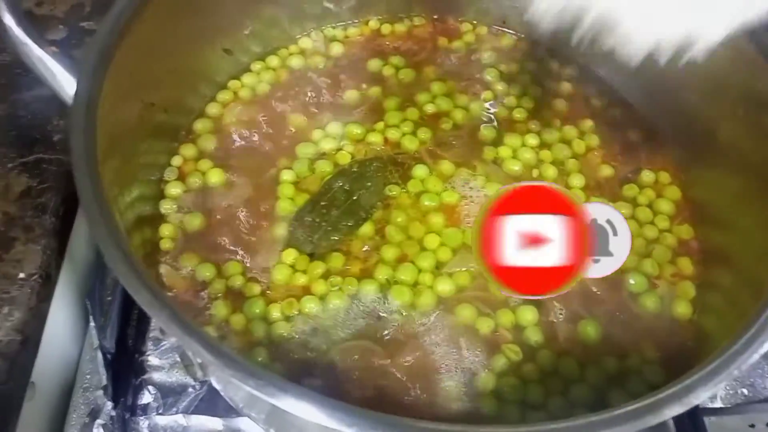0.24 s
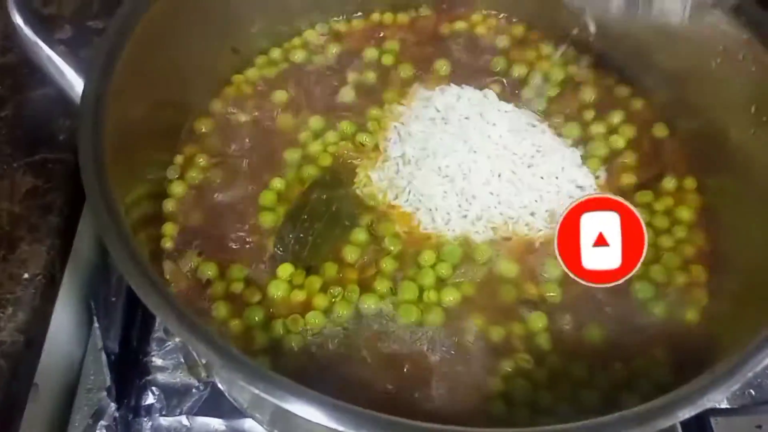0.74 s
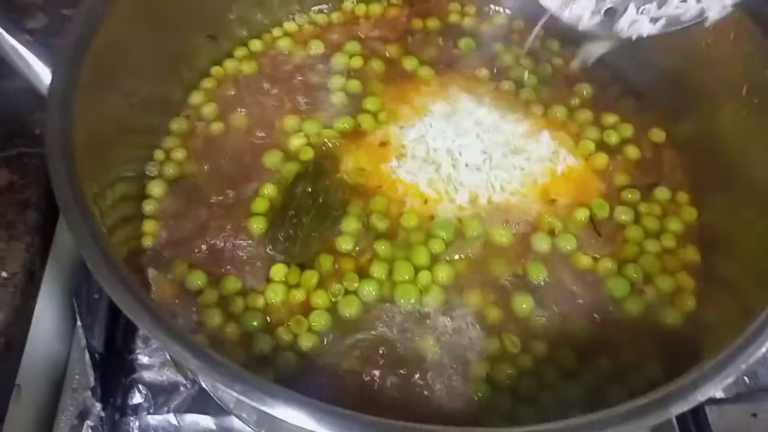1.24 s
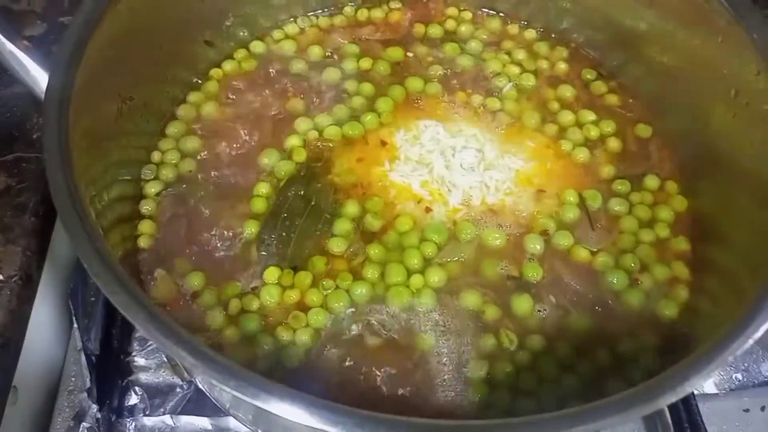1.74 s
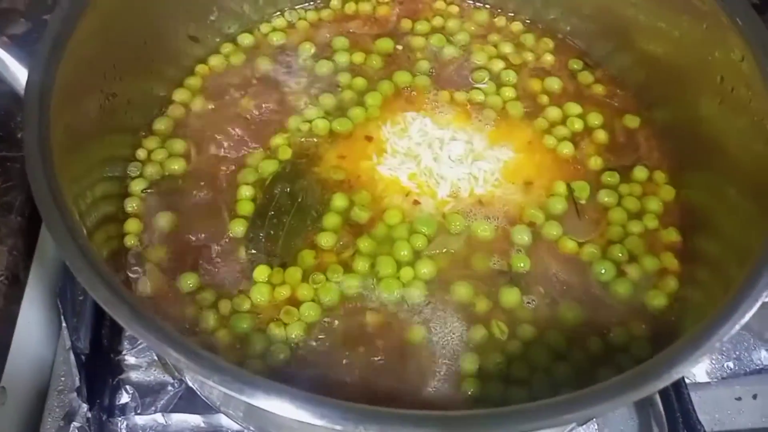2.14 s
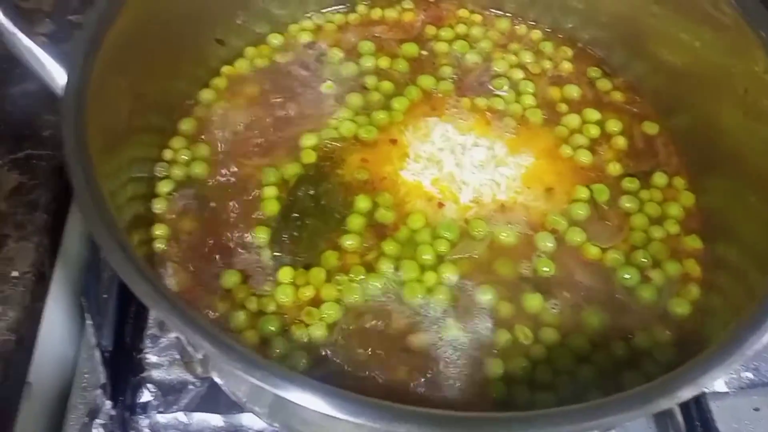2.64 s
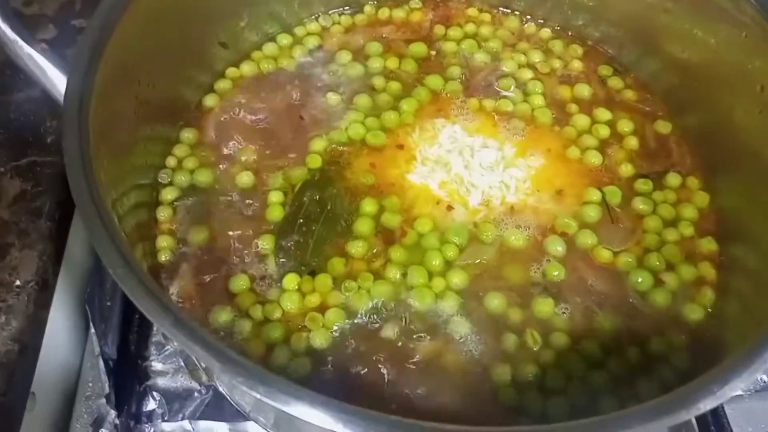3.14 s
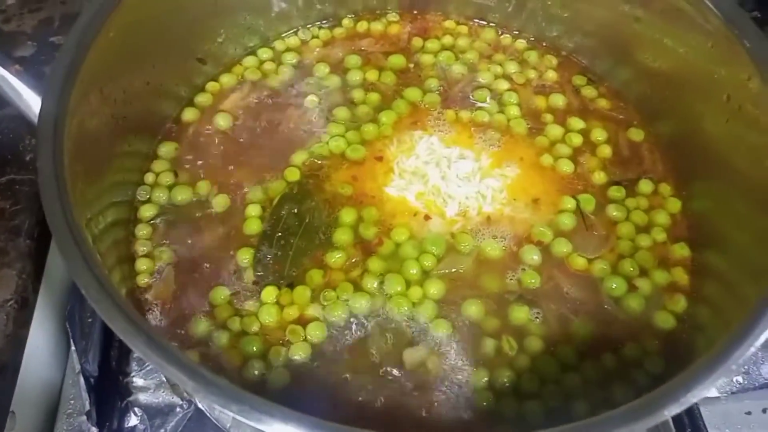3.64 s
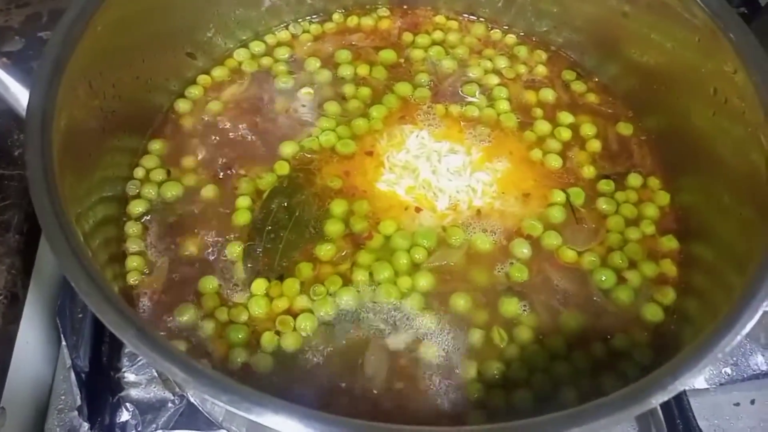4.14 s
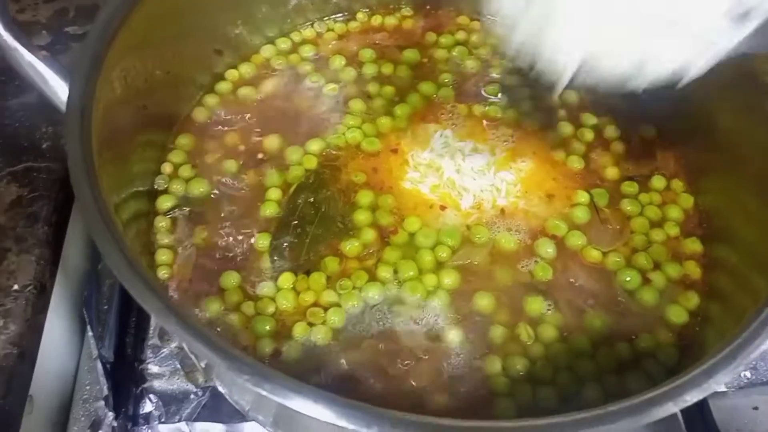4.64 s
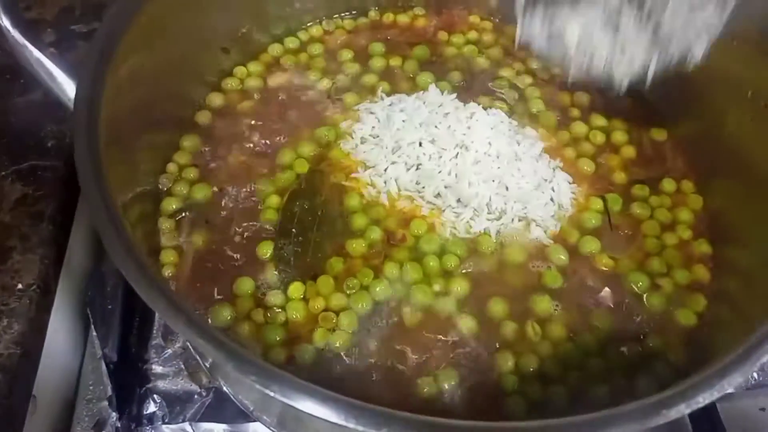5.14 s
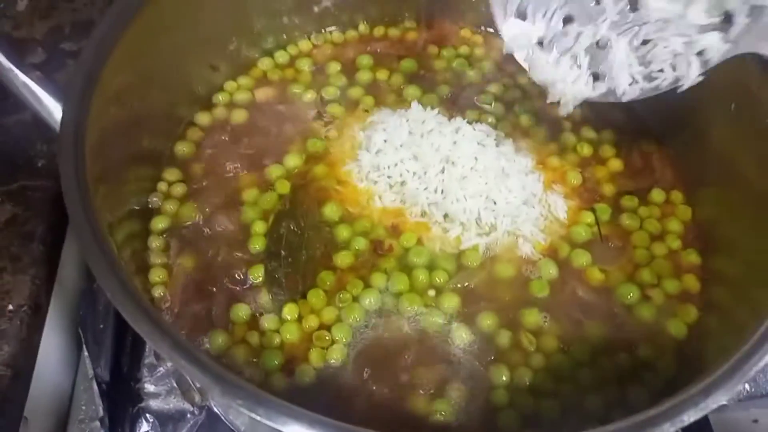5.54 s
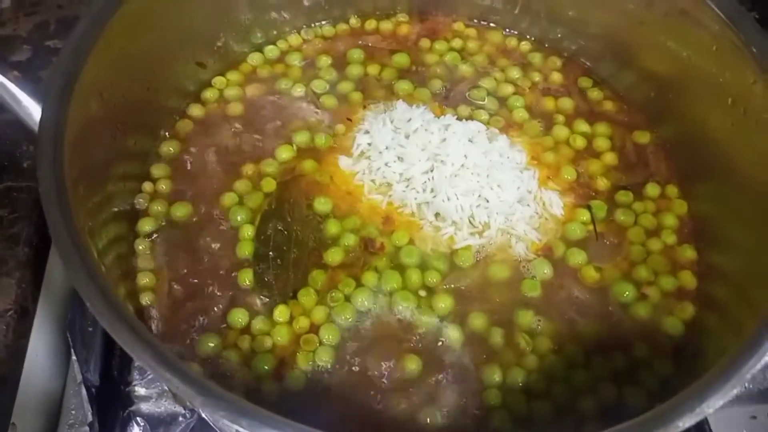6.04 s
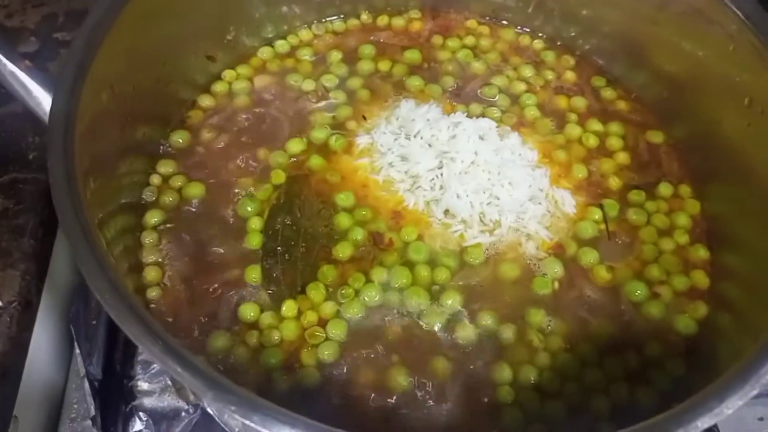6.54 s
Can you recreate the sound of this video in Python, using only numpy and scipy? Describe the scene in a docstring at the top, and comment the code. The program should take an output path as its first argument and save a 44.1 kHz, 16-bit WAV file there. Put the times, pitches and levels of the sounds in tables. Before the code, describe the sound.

A small home kitchen, heard close above a steel pot. A very quiet bed runs throughout: low burner rumble, fine bubbling fizz, and a faint wavering hollow tone from the pot. At about 0.2 s a ladleful of dry rice skids off steel in a dense, bright rush, with a soft trickle near 0.45 s, then stray ticks over the simmer. Around 2.15 s there are light metal touches; at 2.4 s the ladle knocks and digs into a bowl of rice, crunching, scraping and squeaking briefly until a crisp clink at 2.9 s. Simmer and tiny ticks return until 4.8 s, when two quick steel taps ring and grains patter faintly. At 5.23 s comes the loudest sound, a hard, sharp clank with a short ringing tail. After another lull, bright clinks sound at 6.4 s and 6.65 s, quickly dying away.

```python
"""Rice into simmering peas

Small kitchen, microphone just above a steel pot of peas on a burner; a ladle brings rice from a bowl.
Grains rush off the ladle, shift, trickle and land: dense random clicks, coloured, with short echoes.
The ladle digs into the bowl, knocks on the rim and clinks down: noise bursts with ringing metal modes.
Underneath, the burner rumbles and the pot sings faintly (filtered noise), and tiny bubbles burst."""
import sys
import numpy as np
from scipy import signal
from scipy.fft import rfft, irfft, next_fast_len
from scipy.io import wavfile
from scipy.ndimage import uniform_filter1d

SR = 44100
rng = np.random.default_rng(int(sys.argv[2]) if len(sys.argv) > 2 else 0)


def dump(signal):
    """Clip the signal to [-1, 1] and save it as 16-bit WAV at the path in sys.argv[1]."""
    limited = np.clip(np.atleast_2d(signal).T, -1, 1)
    pcm = np.round(limited * 32767).astype(np.int16)
    wavfile.write(sys.argv[1], SR, pcm)


N = 298772
TIME = np.arange(N) / SR

# flame and simmer spectrum: pitch_hz [Hz], level_db [dB per Hz, relative]
BURNER_COLOUR = [(18, -64), (30, -51), (87, -5.5), (132, -4.5), (231, -19), (275, 4.5), (340, -10.5),
                 (908, -8), (1060, -2.5), (1290, -16), (1680, -23.5), (1850, -24.5), (3000, -30),
                 (3900, -65), (6600, -120)]
# hollow tones of the heated pot: pitch_hz [Hz], width_hz [Hz], level_db [dB]
HOLLOW_TONES = [(87.5, 22, -92.5), (263.6, 47, -82.5), (993, 17, -95.5), (1856, 100, -81.5),
                (2706, 73, -87), (9070, 68, -97)]
# the singing tone's level wanders at random: time_s [s], level_db [dB, before SING_GAIN_DB]
SING_LEVEL_CURVE = [(0, -66.5), (0.25, -70), (0.48, -60.5), (0.65, -68.5), (1.3, -66.5), (1.9, -64),
                    (2.15, -67), (2.9, -65.5), (3.05, -75), (3.25, -63.5), (3.7, -68.0), (4.3, -62.5),
                    (4.55, -66.5), (4.85, -65), (5.1, -72), (5.75, -69.5), (6.0, -64), (6.3, -73)]
# fine bubble fizz spectrum: pitch_hz [Hz], level_db [dB per Hz, relative]
FIZZ_COLOUR = [(1500, 10.5), (2600, 4.5), (3100, 4), (4500, 4), (6500, 1), (8000, -4.5), (9600, -1),
               (11500, -7), (13500, -8), (15200, 2)]
# sparse bubble prickle spectrum: pitch_hz [Hz], level_db [dB per Hz, relative]
PRICKLE_COLOUR = [(3000, -13.5), (6000, 6), (8000, -11.5), (10000, 6.5), (13000, -13.5), (15500, 0.5)]
# grains skidding off the steel, spectrum: pitch_hz [Hz], level_db [dB per Hz, relative]
RUSH_SPECTRUM = [(710, -60), (1200, -76), (1520, -19.5), (1770, -25), (1950, -12.5), (2270, -8.5),
                 (2450, -12.5), (2650, -6), (6300, 1), (7820, -4.5), (10100, 1.5), (12300, -11),
                 (16000, -5.5)]
# rice shifting, trickling and landing: start_s [s], level_db [dB], swell_s [s], fade_db_per_s [dB per s]
RICE_POURS = [(.44, -57, 0.11, 100), (2.34, -66, 0.074, 400), (2.97, -70, .04, 73),
              (4.9, -65.5, 0.024, 120), (5.065, -75.5, 0.008, 151.5)]
# rice shifting, trickling and landing, spectrum: pitch_hz [Hz], level_db [dB per Hz, relative]
PATTER_SPECTRUM = [(880, -56), (1500, -13), (1870, -14), (2390, -24), (2640, -7), (3030, -12), (5770, -1),
                   (8000, -11), (9010, -6), (12500, -20), (16000, -8.5)]
# stray grains and single bubbles: start_s [s], pitch_hz [Hz], level_db [dB, relative], t60_s [s]
STRAY_BLIPS = [(1.02, 443, -60, 0.11), (1.11, 1840, -69.5, 0.26), (1.188, 1830, -71.5, 0.37),
               (1.23, 9980, -68, 0.065), (1.74, 1850, -73, 0.078), (3.281, 545, -63, 0.12),
               (3.298, 9300, -69, 0.055), (3.394, 1845, -68, 0.11), (3.552, 4970, -71.5, 0.043),
               (3.69, 1830, -76, 0.31), (4.308, 4330, -69.5, 0.052), (5.073, 10150, -61, 0.066),
               (5.074, 6270, -70, 0.14)]
# ladle contacts: start_s [s], level_db [dB], rise_s [s], t60_s [s], tail_db, thud_db, body_db, top_db
# [dB, relative to the contact], ladle_ring_db, bowl_ring_db, pot_ring_db [dB, relative],
# hollow_focus_hz [Hz], hollow_db [dB, relative]
LADLE_CONTACTS = [ (2.147, -49, 0.00058, 0.051, -28, 5, -3, -17, -82, -82, -78, 1290, -64),
                  (2.16, -64, .003, 0.055, -14, 4, 10, -9, -75, -62.5, -93, 417, -41.5),
                  (2.332, -51.5, 0.00043, 0.015, -12, 18, -41, -7, -76, -68, -96, 154, -53),
                  (2.423, -35, 0.0011, 0.071, -37, 2, 16, -6, -72, -39.5, -92, 660, -34),
                  (2.927, -32.5, 0.00047, 0.061, -24, -4.5, -5.5, -4.5, -59, -88, -65, 1620, -54.5),
                  (4.817, -41.5, 0.00067, 0.029, -1, -7, -1.5, -3, -58, -70, -47, 382, -49),
                  (4.879, -44, 0.00057, 0.048, -34, 14.5, 4.5, -15, -66, -74, -69, 2130, -51.5),
                  (5.229, -19.5, 0.0024, 0.12, -23, -4.5, -21, -15.5, -70.5, -58, -24, 399, -30.5),
                  (6.378, -31.5, 0.00097, 0.03, -6.5, -8.5, -19, 0.5, -43, -69, -59, 1080, -39),
                  (6.423, -38, 0.002, 0.11, -24.5, 6, 12, -8, -54, -55, -54, 160, -58),
                  (6.647, -25, 0.0064, 0.12, -16, -30, -3.5, -2, -35, -68, -61, 1260, -41)]
# crowd of close steel modes that every contact stirs: pitch_hz [Hz], level_db [dB per Hz, relative]
STEEL_COLOUR = [(65, -22.5), (150, 6), (230, -5.5), (430, -1), (780, -18.5), (1400, -5.5), (1700, -18),
                (2600, 0.5), (3300, -7), (4300, -1), (6300, 4.5), (8000, -2), (10000, 3.5), (13000, -6.5),
                (15500, -2)]
# air inside the vessels: pitch_hz [Hz], level_db [dB, relative], t60_s [s]
AIR_MODES = [(155.7, -1, 0.47), (401, -3, 0.12), (535, -11.5, 0.18), (634, -6, 0.096), (965, -2.5, 0.065),
             (1286, -9, 0.14), (1466, 0, 0.12), (2075, -10.5, 0.34)]
# ringing modes of ladle, bowl and pot: pitch_hz [Hz], level_db [dB, relative], t60_s [s]
LADLE_MODES = [(1307, -19, 0.22), (1452, -13, 0.24), (2517, -21, 0.24), (2630, -19, 0.2), (2954, -13, 0.19),
               (3323, -17, 0.24), (3510, -8, 0.17), (3900, -11, 0.15), (4472, -2, 0.11), (4610, -11, 0.17),
               (4885, -1, 0.12), (5056, -16, 0.24), (5217, -7, 0.18), (5337, -12, 0.18), (5691, -7, 0.14),
               (6264, -8, 0.19), (6444, -9, 0.19), (6549, -8, 0.14), (6726, -2, 0.14), (6848, -11, 0.18),
               (6959, 0, 0.1), (7313, -11, 0.17), (9439, -5, 0.11), (10220, 0, 0.1)]
BOWL_MODES = [(520, -3, .15), (655, 3, .16), (980, -10, .12), (1290, -4, .18), (1410, -3, .18),
              (1900, -9, .14), (2030, -3, .15), (2140, -6, .15)]
POT_MODES = [(987, -9, 0.5), (1968, -10, 0.35), (2016, -19, 0.5), (2056, -21, 0.49), (2459, -13, 0.3),
             (2627, -16, 0.38), (2815, -13, 0.3), (2910, -17, 0.3), (3676, -20, 0.5), (4033, -16, 0.3),
             (4082, -9, 0.32), (4125, -21, 0.47), (4216, -2.5, 0.36), (4335, -18, 0.42), (4388, -14, 0.42),
             (4468, -18, 0.49), (4950, -8, 0.33), (5434, -16, 0.32), (5512, -6, 0.35), (5586, -11, 0.35),
             (5716, -17, 0.35), (5808, -18, 0.35), (5927, -9, 0.35), (5993, -11, 0.34), (6149, -9, 0.35),
             (6201, -14, 0.35), (6244, -17, 0.35), (6280, -14, 0.35)]
# the pot wall's crowded weaker modes, heard as a wash: pitch_hz [Hz], level_db [dB per Hz, relative]
POT_WASH_COLOUR = [(900, -11), (1700, -26.5), (2100, 0), (2900, -23.5), (3300, -19), (3700, -9), (4300, 4),
                   (4800, -7), (5700, 3.5), (6350, 8.5), (6900, -39), (8000, -42.5), (9400, -27.5),
                   (12000, -42.5)]
# close modes of pot and ladle that a tap favours, left shimmering:
# start_s [s], pitch_hz [Hz], width_hz [Hz], level_db [dB], t60_s [s]
MODE_SHIMMERS = [(2.149, 1310, 160, -53, 0.13), (2.333, 6700, 300, -52, 0.046),
                 (2.928, 5750, 350, -53.5, 0.42), (2.929, 2440, 600, -50, 0.15),
                 (4.816, 5160, 500, -46, 0.23), (4.818, 2810, 200, -50.5, 0.19),
                 (4.834, 405, 60, -56, 0.22), (5.231, 2094, 130, -36, 0.2),
                 (5.232, 6350, 304.6, -37.5, 0.16), (6.377, 3930, 603, -35.5, 0.17),
                 (6.378, 1017, 90, -39, 0.14), (6.423, 6850, 900, -54, 0.18), (6.65, 5220, 130, -42, 0.22),
                 (6.665, 410, 59, -53.5, 0.18)]
# slips of the ladle along the bowl: start_s [s], level_db [dB, relative], squeak_hz [Hz]
LADLE_SLIPS = [(2.4886, -41, 6500), (2.5384, -68, 6500), (2.5606, -63, 6500), (2.579, -34.5, 10600),
               (2.604, -35.5, 10520), (2.617, -32.5, 6400), (2.6314, -37, 6300), (2.6883, -43.5, 4440),
               (2.7446, -48.5, 4500), (2.8606, -54.5, 5730)]
# resonances of bowl and ladle, damped by the rice: pitch_hz [Hz], width_hz [Hz], level_db [dB, relative]
DIG_RESONANCES = [(1285, 12, -5), (1442, 62, -3.5), (2112, 53, -11), (2720, 55, -10.5), (3400, 130, -14),
                  (3830, 82, -12), (4700, 100, -6.5), (5200, 93, -3), (5900, 40, -3), (6300, 107, 1.5),
                  (8030, 640, -12.5), (10050, 95, -0.5), (10800, 36, -6), (12500, 620, -20),
                  (14500, 430, -14)]

SING_HZ, SING_WIDTH_HZ, SING_GAIN_DB = 1093, 16, -3.35
SING_STEADINESS = 0.15   # 0 wavers freely, 1 has an even level
PLOPS_PER_S, PLOP_DB, PLOP_CYCLES = 16, -79.5, 11.5   # big slow bubbles in the broth
POPS_PER_S, POP_DB, POP_CYCLES = 30, -84.5, 70   # small ones at the surface
RUSH_S, RUSH_DB, RUSH_ATTACK_S, RUSH_FADE_DB_PER_S = 0.1853, -28.5, 0.013, 435
CLUMPS_PER_S, CLUMP_DB = 90, 3   # rice moves in clumps
STRUCK_SING_DB, STRUCK_SING_T60_S = -34.5, 0.56   # a knock rings the singing tone; relative to the knock
STILL_AFTER_S, STILL_DB_PER_S = 0.25, 170   # the ladle settles on the metal and stills it
POT_RING_DB, RING_WET_DB, STRIKE_SPREAD_DB = -8.5, -15, 1
# one scoop: the ladle bites, the rice gives way, the ladle lifts out
DIG_S, DIG_DB, DIG_ATTACK_S, DIG_SAG_DB_PER_S = 2.425, -45, 0.0079, 43.5
DIG_HOLD_S, DIG_LIFT_DB_PER_S = 0.29, 175
# first touch of the hardest knock
CRACK_S, CRACK_DB, CRACK_LEFT_DB, CRACK_RIGHT_DB = 5.2311, 3, 4, 0.5
CRACK_ABOVE_HZ, CRACK_DULL_HZ = 6500, 7000
SIDE_DB, SIDE_ABOVE_HZ = -26.5, 7060   # faint treble copy, opposite in sign left and right
CUTOFF_HZ = 15900


def from_db(db):
    """Decibels to gain."""
    return 10 ** (np.asarray(db) / 20)


def rms_one(x):
    """Scale to unit power."""
    return x / np.sqrt(np.mean(x ** 2) + 1e-20)


def at_hz(points, hz):
    """Read a spectrum on a log-frequency axis."""
    point_hz, db = np.transpose(points)
    return np.interp(np.log(hz + 1), np.log(point_hz), db)


def coloured(x, spectrum):
    """Give a signal a spectrum that falls away below its lowest point; rms 1."""
    size = next_fast_len(len(x))
    hz = np.arange(size // 2 + 1) * SR / size
    skirt = np.minimum(hz / spectrum[0][0], 1) ** 2
    gain = from_db(at_hz(spectrum, hz)) * skirt
    return rms_one(irfft(rfft(x, size) * gain, size)[:len(x)])


def resonate(x, hz, width):
    """Two-pole resonance with gain about 1 on top."""
    r = np.exp(-np.pi * width / SR)
    feed = np.array([1, 0, -1]) * (1 - r * r) / 2
    poles = [1, -2 * r * np.cos(2 * np.pi * hz / SR), r * r]
    return signal.lfilter(feed, poles, x + 1e-18)


def flicker(per_s, size=N):
    """Random wander with a spread of about 1, straight lines between per_s knots a second."""
    knots = rng.standard_normal(700)
    return np.interp(TIME[:size] * per_s, np.arange(len(knots)), knots)


def grains(per_s, spread_db):
    """Random clicks of uneven size and either sign; rms 1."""
    sizes = from_db(spread_db * np.minimum(rng.exponential(1, N), 4)) * rng.choice([-1, 1], N)
    return rms_one(sizes * (rng.random(N) < per_s / SR))


def add(out, s, sound):
    """Mix a sound in at a time."""
    at = int(s * SR)
    out[at:at + len(sound)] += sound[:N - at]


def gesture(s, db, attack, fade_db_per_s):
    """Gain over time: a straight swell to full level, then a steady fade in dB."""
    age = TIME - s
    return np.clip(age / attack, 0, 1) * from_db(db - fade_db_per_s * np.maximum(age - attack, 0))


def steely(x):
    """Thin steel passes some pitches and swallows others, about every 110 Hz; rms 1."""
    size = next_fast_len(len(x))
    hz = np.arange(size // 2 + 1) * SR / size
    ripple_db = 4.5 * np.clip(rng.standard_normal(210), -2, 1.5)
    depth = np.minimum(hz / 3000, 1)   # shallower in the lows
    gain = from_db(np.interp(hz / 110, np.arange(len(ripple_db)), ripple_db) * depth)
    return rms_one(irfft(rfft(x, size) * gain, size)[:len(x)])


def kitchen(x, wet_db, t60):
    """Dense echoes from the pot's wall and the room, duller than the direct sound."""
    t = TIME[:SR // 2]
    tail = rng.standard_normal(len(t)) * from_db(-60 * t / t60) * (t > 0.003)
    tail = signal.sosfilt(signal.butter(2, 7000, fs=SR, output="sos"), tail)
    return x + from_db(wet_db) * signal.fftconvolve(x, tail / np.linalg.norm(tail))[:N]


def burner():
    """Flame rumble as coloured noise, with a rolling low resonance that flickers."""
    flame = from_db(-70) * coloured(rng.standard_normal(N), BURNER_COLOUR)
    low = resonate(resonate(rng.standard_normal(N), 169, 110), 169, 110)
    return flame + from_db(-82.5 + 2.5 * flicker(23)) * rms_one(low)


def pot_hollow():
    """The heated pot's hollow tones: noise through resonances whose levels flicker."""
    out = np.zeros(N)
    for hz, width, db in HOLLOW_TONES:
        tone = rms_one(resonate(rng.standard_normal(N), hz, width))
        out += from_db(db + 2 * flicker(48)) * tone
    return out


def pot_singing():
    """A narrow resonance fed by noise wavers, is partly evened out, and wanders in level."""
    waver = resonate(rng.standard_normal(N), SING_HZ, SING_WIDTH_HZ)
    waver = resonate(waver, SING_HZ, SING_WIDTH_HZ)
    power = uniform_filter1d(waver ** 2, size=SR // 12) + 1e-20
    evened = rms_one(waver / power ** (SING_STEADINESS / 2))
    level_db = np.interp(TIME, *np.transpose(SING_LEVEL_CURVE))
    return from_db(SING_GAIN_DB + level_db) * evened


def bubbles(per_s, low_hz, high_hz, cycles, count):
    """Bubbles burst at random, each ringing for some cycles at one of many pitches; rms 1."""
    out = np.zeros(N)
    for hz in np.geomspace(low_hz, high_hz, count):
        bursts = grains(per_s / count, spread_db=0)
        out += resonate(bursts, hz, 2 * hz / cycles) / np.sqrt(hz)
    return rms_one(out)


def broth():
    """Bubbles from slow plops and surface pops, which ring, to prickle and fine fizz."""
    plops = bubbles(PLOPS_PER_S, low_hz=97.6, high_hz=560, cycles=PLOP_CYCLES, count=12)
    pops = bubbles(POPS_PER_S, low_hz=775, high_hz=2050, cycles=POP_CYCLES, count=16)
    fizz = from_db(-74.5) * coloured(rng.standard_normal(N), FIZZ_COLOUR)
    prickle = from_db(-82.5) * coloured(grains(320, spread_db=2), PRICKLE_COLOUR)
    return from_db(PLOP_DB) * plops + from_db(POP_DB) * pops + fizz + prickle


def rice_rush():
    """The first ladleful skids off the steel in one go: a dense burst of grain clicks."""
    level = gesture(RUSH_S, RUSH_DB, RUSH_ATTACK_S, RUSH_FADE_DB_PER_S)
    rush = level * coloured(grains(9000, spread_db=2), RUSH_SPECTRUM)
    return kitchen(rush, wet_db=-15, t60=0.28)


def rice_patter():
    """Rice shifts, trickles and lands in clumps; some grains tick at the ladle's pitches."""
    flow = sum(gesture(*pour) for pour in RICE_POURS) * from_db(CLUMP_DB * flicker(CLUMPS_PER_S))
    ticks = rms_one(sum(resonate(grains(30, spread_db=2), hz, 35) for hz, _, _ in LADLE_MODES[2::2]))
    patter = steely(grains(2500, spread_db=3)) + from_db(-8) * ticks
    return kitchen(flow * coloured(patter, PATTER_SPECTRUM), wet_db=-12.5, t60=0.088)


def hollow_ring(hz, t60, t):
    """A short resonance whose pitch and strength waver as its echoes pile up."""
    phase = 2 * np.pi * hz * t + 0.9 * flicker(70, size=len(t))
    swell = (1 - np.exp(-t * hz / 6)) ** 2   # builds over several cycles
    fade = from_db(-60 * t / t60 + 2.5 * flicker(70, size=len(t)))
    return 2 * swell * fade * np.sin(phase)


def blips():
    """Stray grains tick on the steel and single bubbles burst, each a wavering, decaying tone."""
    out = np.zeros(N)
    for s, hz, db, t60 in STRAY_BLIPS:
        add(out, s, from_db(db + 2.5) * hollow_ring(hz, t60, TIME[:SR // 2]))
    return out


def crash(t, rise, t60, tail_db, thud_db, body_db, top_db):
    """Steel chatters on steel: a crowd of close modes dies fast and leaves a room tail."""
    edges = np.geomspace(50, 17000, 25)
    hz = np.sqrt(edges[1:] * edges[:-1])[:, None]   # band centres
    bins = np.arange(len(t) // 2 + 1) * SR / len(t)
    bands = (bins >= edges[:-1, None]) & (bins < edges[1:, None])
    steel = coloured(steely(rng.standard_normal(len(t))), STEEL_COLOUR)
    noise = irfft(rfft(steel) * bands, len(t))
    tone_db = [(400, thud_db), (1000, body_db), (2000, body_db), (3200, 0.0035), (6200, 0.0023), (8500, top_db)]
    tone = from_db(at_hz(tone_db, hz))
    room_t60 = at_hz([(150, 1.0), (600, 0.85), (5000, 0.32), (8000, 0.18), (14000, 0.16)], hz)   # Hz, s
    age = np.maximum(t - 4.5 / hz, 0)
    swell = 1 - np.exp(-age / (rise + 1 / hz))   # lows start and swell later than highs
    chatter = from_db(2 * flicker(400, size=len(t)))
    fade = chatter * from_db(-60 * age / t60) + from_db(tail_db - 60 * age / room_t60)
    return np.sum(noise * tone * swell * fade, axis=0)


def struck_air(focus_hz, t):
    """A contact stirs the air in the vessels, favouring the air modes near its focus."""
    out = np.zeros(len(t))
    for hz, db, t60 in AIR_MODES:
        off_focus_db = -14 * abs(np.log2(hz / focus_hz))
        out += from_db(db + off_focus_db) * hollow_ring(hz, t60, t)
    return out


def pot_wash(t, db, t60):
    """The pot's wall shimmers with more modes than can be told apart."""
    fade = from_db(-60 * t / t60) * (1 - np.exp(-t / 0.003))
    return from_db(db) * fade * coloured(rng.standard_normal(len(t)), POT_WASH_COLOUR)


def ring(modes, t):
    """Decaying sines, each struck with a strength of its own and building over several cycles."""
    hz, db, t60 = np.transpose(modes)[:, :, None]
    strength = from_db(db + STRIKE_SPREAD_DB * rng.standard_normal(hz.shape))
    fade = from_db(-60 * t / t60)
    build = 1 - np.exp(-t * hz / 7)
    tones = np.sin(2 * np.pi * (hz * t + rng.random(hz.shape)))
    return np.sum(strength * fade * build * tones, axis=0)


def knocks():
    """Each contact crashes and stirs the air in the vessel; ladle, bowl and pot ring on."""
    hits, rings, t = np.zeros(N), np.zeros(N), TIME[:SR * 3 // 4]
    damping = from_db(-STILL_DB_PER_S * np.maximum(t - STILL_AFTER_S, 0))
    for contact in LADLE_CONTACTS:
        s, db, rise, t60, tail_db, thud_db, body_db, top_db = contact[:8]
        ladle_db, bowl_db, pot_db, focus_hz, hollow_db = contact[8:]
        add(hits, s, from_db(db) * crash(t, rise, t60, tail_db, thud_db, body_db, top_db))
        add(hits, s, from_db(hollow_db) * struck_air(focus_hz, t))
        add(hits, s, from_db(db + STRUCK_SING_DB) * hollow_ring(SING_HZ, STRUCK_SING_T60_S, t))
        ring_s = s + 0.002
        add(hits, ring_s, from_db(pot_db) * damping * pot_wash(t, db=-5, t60=0.41))
        add(rings, ring_s, from_db(ladle_db) * damping * ring(LADLE_MODES, t))
        add(rings, ring_s, from_db(bowl_db) * damping * ring(BOWL_MODES, t))
        add(rings, ring_s, from_db(pot_db + POT_RING_DB) * damping * ring(POT_MODES, t))
    return hits + kitchen(rings, wet_db=RING_WET_DB, t60=0.19)


def shimmers():
    """A cluster of neighbouring modes, as narrow noise, beats and dies away after a tap."""
    out, t = np.zeros(N), TIME[:SR // 2]
    for s, hz, width, db, t60 in MODE_SHIMMERS:
        cluster = rms_one(resonate(resonate(rng.standard_normal(len(t)), hz, width), hz, width))
        add(out, s, cluster * from_db(db - 60 * t / t60) * (1 - np.exp(-t / 0.002)))
    return out


def dig():
    """Grains grind between ladle and bowl, whose resonances flicker; slips push harder and squeak."""
    lift = from_db(-DIG_LIFT_DB_PER_S * np.maximum(TIME - DIG_S - DIG_HOLD_S, 0))
    force = gesture(DIG_S, DIG_DB, DIG_ATTACK_S, DIG_SAG_DB_PER_S) * lift
    squeaks, t = np.zeros(N), TIME[:SR // 10]
    for s, db, hz in LADLE_SLIPS:
        add(force, s, from_db(db - 16) * np.exp(-t / 0.0012))
        stick_slip = rng.standard_normal(len(t)) * np.exp(-t / 0.012)
        add(squeaks, s, from_db(db + 10.5) * resonate(stick_slip, hz, 320))
    grind = force * from_db(CLUMP_DB * flicker(CLUMPS_PER_S)) * grains(1500, spread_db=3)
    bowl = np.zeros(N)
    for hz, width, db in DIG_RESONANCES:
        bowl += from_db(db + 4 * flicker(35)) * resonate(grind, hz, width)
    crunch = signal.sosfilt(signal.butter(1, [3000, 11000], "band", fs=SR, output="sos"), grind)
    return kitchen(from_db(16) * bowl + from_db(-27) * crunch + squeaks, wet_db=-11, t60=0.4)


def crack():
    """Bare steel meets steel in one sharp tick that reaches the two sides in opposite phase."""
    click = np.full(N, 1e-18)
    click[int(CRACK_S * SR)] = from_db(CRACK_DB)
    tick = signal.sosfilt(signal.butter(4, CRACK_ABOVE_HZ, "high", fs=SR, output="sos"), click)
    tick = signal.sosfilt(signal.butter(1, CRACK_DULL_HZ, fs=SR, output="sos"), tick)
    return np.array([from_db(CRACK_LEFT_DB) * tick, -from_db(CRACK_RIGHT_DB) * tick])


def scene():
    """All in the middle but the crack and a faint delayed treble copy of opposite sign left and right."""
    simmer = burner() + pot_hollow() + pot_singing() + broth()
    bright = rice_rush() + rice_patter() + knocks() + shimmers()
    mid = simmer + bright + blips() + dig()
    treble = signal.sosfilt(signal.butter(8, SIDE_ABOVE_HZ, "high", fs=SR, output="sos"), bright)
    side = from_db(SIDE_DB) * np.pad(treble, (150, 0))[:N]   # delayed by 150 samples
    return np.array([mid + side, mid - side]) + crack()


def record(dry):
    """The top is cut steeply above CUTOFF_HZ."""
    return signal.sosfilt(signal.ellip(10, 0.1, 80, CUTOFF_HZ, fs=SR, output="sos"), dry)


dry = scene()
out = record(dry)
dump(out)
```